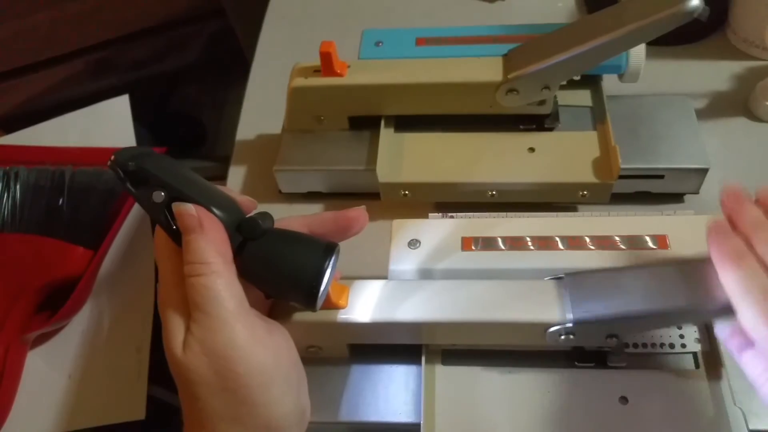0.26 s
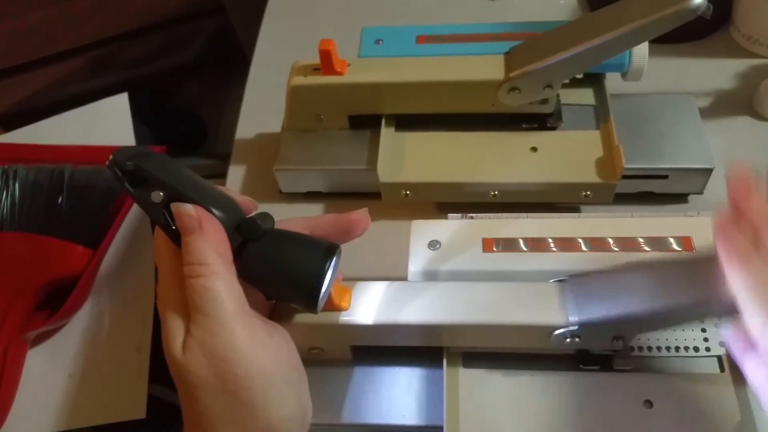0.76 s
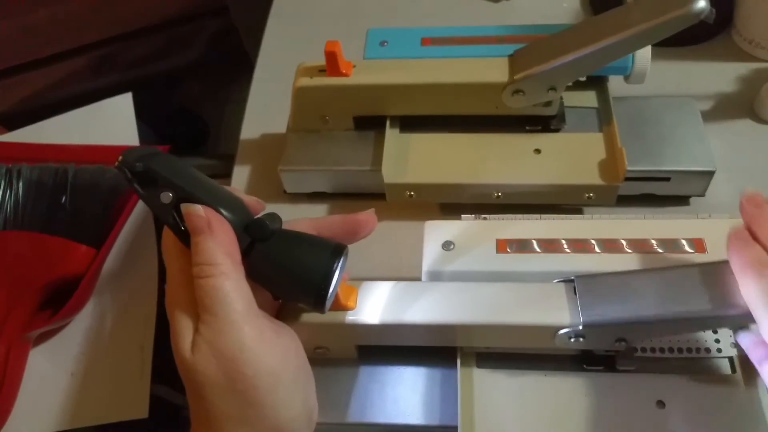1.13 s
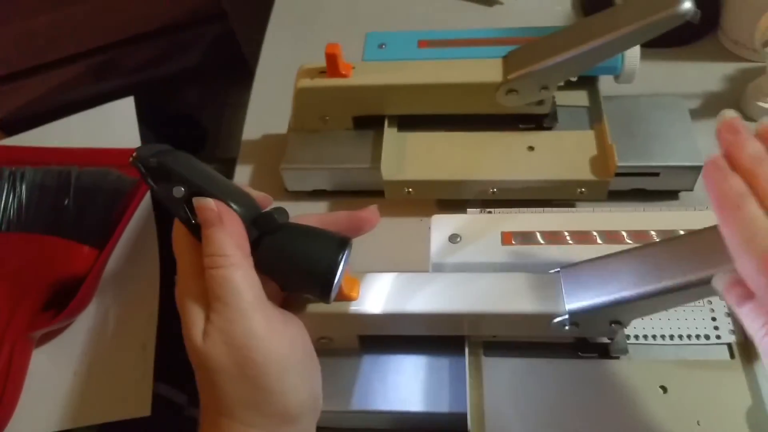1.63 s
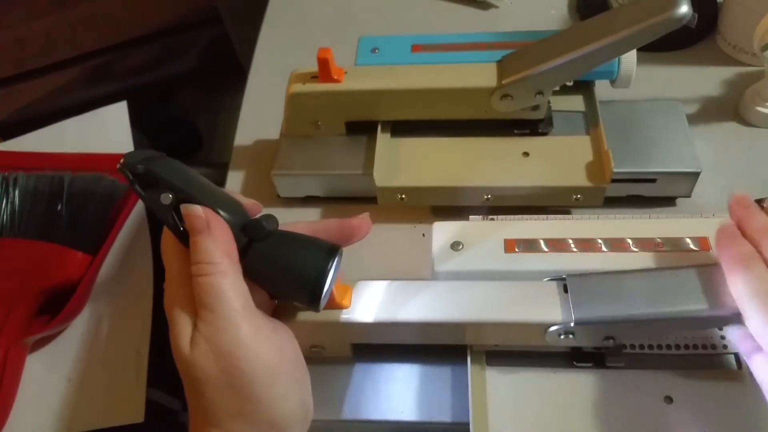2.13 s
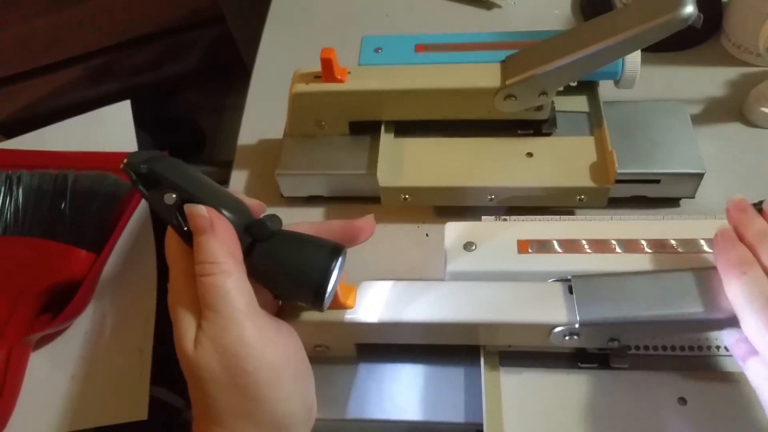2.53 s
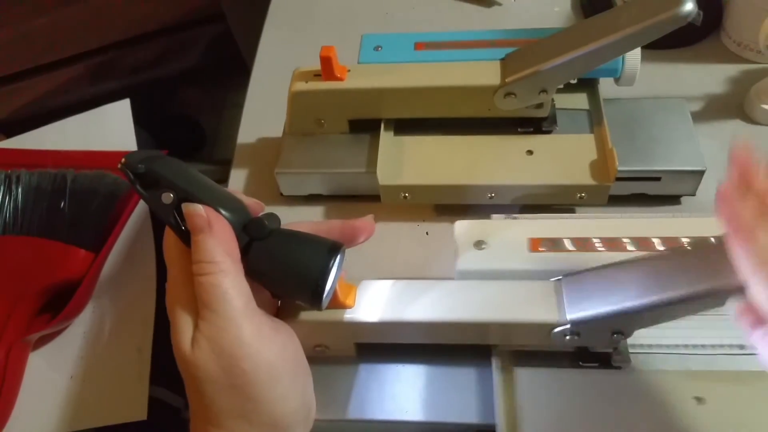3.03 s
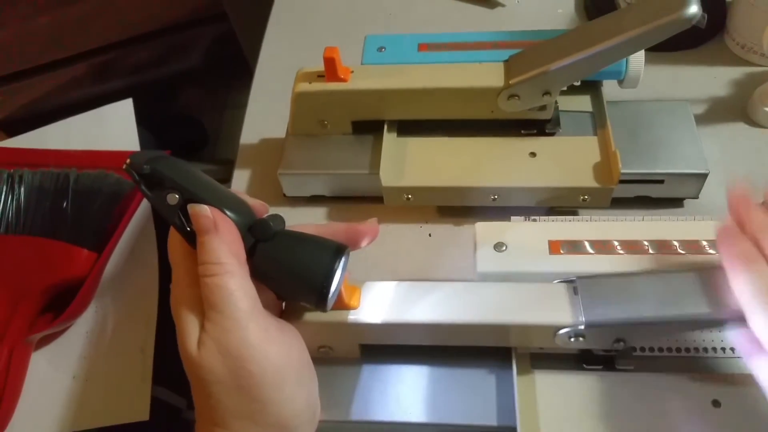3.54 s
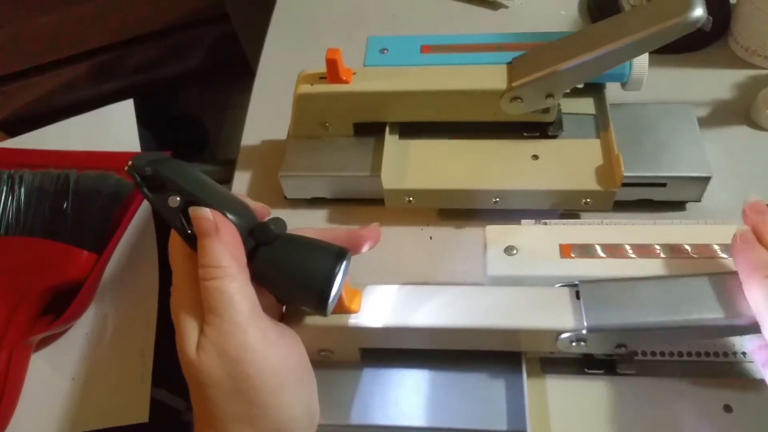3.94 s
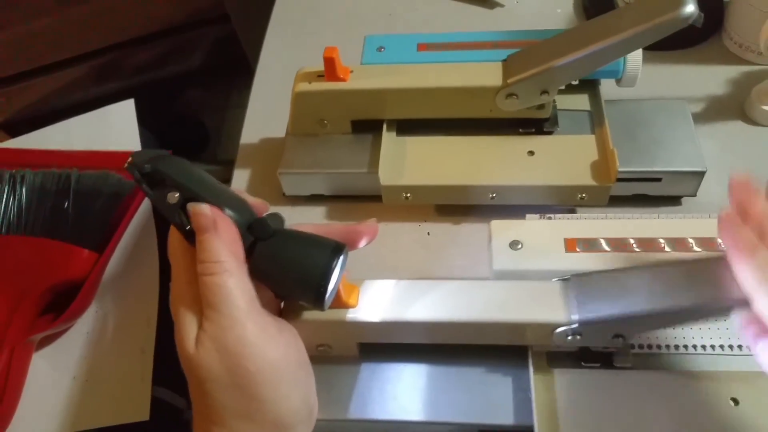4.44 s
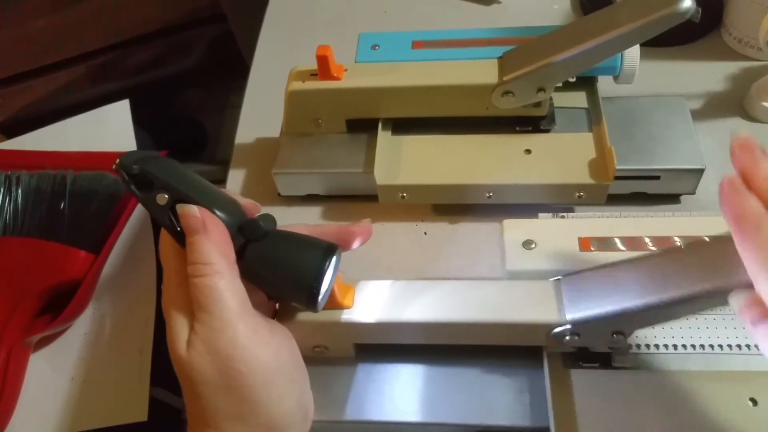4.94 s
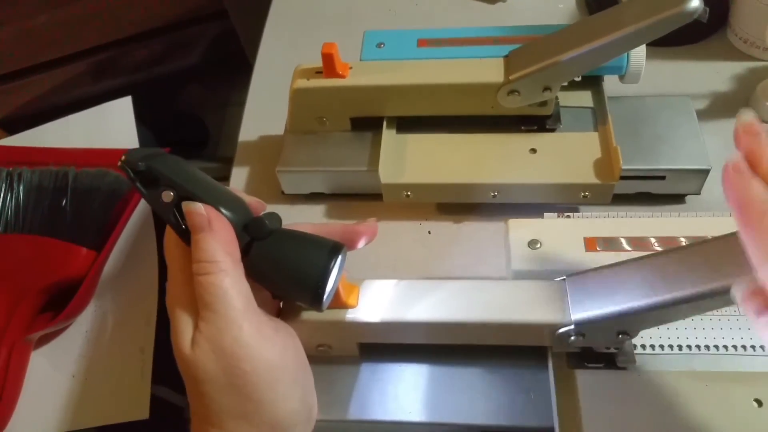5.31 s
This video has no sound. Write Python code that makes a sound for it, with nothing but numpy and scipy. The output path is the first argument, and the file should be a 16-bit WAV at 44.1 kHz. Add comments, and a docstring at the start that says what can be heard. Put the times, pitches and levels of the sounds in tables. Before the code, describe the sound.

A metal hand punch is worked quickly on a table, nearly three strokes a second. Each stroke has light ticks, a bright snap through plastic card, a heavier clunk at the bottom, then a hard rattling slam at the top stop. Close and dry in a small room, it plays from the right channel only; the left carries faint hiss.

```python
"""A hand works the lever of a small card punch on a table, about three strokes a second.
Going down the pawl ticks, the pins snap through the card and the lever bottoms; coming up it slams
on its stop and bounces. Each knock is a burst of noise that sets table, casing and lever ringing, while
loose parts sizzle and a small room echoes. Only the right microphone works, over a steady murmur;
the left input carries its own faint hiss."""
import sys
import numpy as np
from scipy import signal
from scipy.fft import rfft, irfft
from scipy.io import wavfile
from scipy.ndimage import uniform_filter1d

SR = 44100
rng = np.random.default_rng(int(sys.argv[2]) if len(sys.argv) > 2 else 0)


def wav_record(signal):
    """Record a signal, one row per channel, as 16-bit PCM in the file named by sys.argv[1]."""
    frames = np.transpose(np.atleast_2d(signal))
    bounded = np.clip(frames, -1, 1)
    # unit amplitude maps onto the largest positive 16-bit level
    quanta = np.round(bounded * 32767).astype(np.int16)
    wavfile.write(sys.argv[1], SR, quanta)


def invert_db(level):
    """Linear amplitude ratio for a level in decibels (20 dB per decade), elementwise."""
    return 10 ** (np.asarray(level, dtype=float) / 20)


N = 245621  # samples in the scene
RING = 8192  # samples that one knock may last


def coloured(shape, points):
    """Noise along the last axis whose spectrum follows (f/Hz, level/dB) points, scaled to rms 1."""
    hz, db = np.transpose(points)
    f = np.maximum(np.fft.rfftfreq(shape[-1], 1 / SR), 1)
    gain = invert_db(np.interp(np.log(f), np.log(hz), db))
    noise = irfft(rfft(rng.standard_normal(shape)) * gain, shape[-1])
    return noise / np.std(noise)


def fade(t60, size):
    """Exponential decay, 60 dB down after t60 seconds."""
    return np.exp(-np.log(1000) * np.arange(size) / SR / t60)


def high_pass(x, hz):
    """Steep low cut."""
    return signal.sosfilt(signal.butter(6, hz, "high", fs=SR, output="sos"), x)


def band(x, low_hz, high_hz):
    """Steep band-pass."""
    return signal.sosfilt(signal.butter(3, (low_hz, high_hz), "band", fs=SR, output="sos"), x)


def hiss():
    """Faint hiss of the dead input; a little of its square makes the wave lopsided."""
    # colour of the hiss: (f/Hz, level per Hz/dB)
    hiss_colour = [(30, -1), (60, 5), (130, 7), (300, 3), (800, -1), (2000, -5), (3000, -9), (4500, -16),
                   (6500, -20), (9000, -17), (12000, -16), (15000, -18)]
    noise = coloured((N,), hiss_colour)
    return invert_db(-65.7) * (noise - 0.08 * (noise ** 2 - 1))


def murmur():
    """Steady low murmur under the knocks: coloured noise."""
    # colour of the murmur: (f/Hz, level per Hz/dB)
    murmur_colour = [(25, -53), (40, -3.5), (60, -10.5), (130, -4.5), (300, -15), (600, -29.5),
                     (1000, -13.5), (2500, -33.5), (6000, -43), (12000, -55), (16000, -37)]
    return invert_db(-48.5) * coloured((N,), murmur_colour)


def kind(rows, ms, table_db=None, sizzle_db=None):
    """One kind of knock shares a contact length; table follows casing and sizzle follows lever, unless listed."""
    s, casing_db, lever_db, *own = np.transpose(rows)
    table = own[0] if table_db is None else casing_db + table_db
    sizzle = own[0] if sizzle_db is None else lever_db + sizzle_db
    return np.array([s, table, casing_db, lever_db, sizzle, np.full(len(s), ms)])


def lever_bounces():
    """The lever bounces back softly about 0.1 s after a slam."""
    # bounces: (t/s, casing level/dB, lever level/dB)
    bounces = [(.0182, -40.5, -40), (.3131, -35, -40), (.6502, -39.5, -42.5), (.9898, -39.5, -44.5),
               (1.3289, -33.5, -40), (1.3863, -47.5, -62), (1.5576, -35, -47), (1.9631, -40.5, -54),
               (2.3258, -34, -43.5), (2.669, -37.5, -39.5), (3.0327, -36.5, -43), (3.393, -38.5, -42.5),
               (3.7412, -40.5, -44), (4.1202, -34.5, -41), (4.4777, -34.5, -41.5), (4.8376, -37.5, -40.5),
               (5.203, -36, -43), (5.4412, -38, -41)]
    return kind(bounces, ms=3.2, table_db=-5, sizzle_db=-14)


def pawl():
    """On the down stroke the pawl meets the rack, slips along a tooth and drops in."""
    # dull tick on the rack: (t/s, casing level/dB, lever level/dB)
    meets = [(.3496, -49, -41.5), (.691, -46, -45), (1.0306, -49, -39), (1.602, -44, -47),
             (2.0047, -55, -44.5), (2.3638, -43, -55), (2.708, -44, -44), (3.077, -52, -39.5),
             (3.4354, -47, -41), (3.7847, -57, -46), (4.091, -44, -49), (4.1634, -45, -47),
             (4.518, -53, -43.5), (4.8804, -45, -43.5), (5.2454, -46, -44.5)]
    # slip along the tooth: (t/s, casing level/dB, lever level/dB)
    slips = [(.0344, -40, -46), (.3646, -42, -54), (1.0454, -43, -53), (2.0198, -45, -48),
             (2.3785, -43, -48), (2.7228, -45, -57), (3.0928, -47, -61), (3.4535, -44, -48),
             (3.8035, -43, -47), (4.178, -50, -44), (4.533, -45, -49), (4.8968, -46, -49),
             (5.2935, -37.5, -35)]
    # sharp click as it drops in: (t/s, casing level/dB, lever level/dB)
    clicks = [(.3737, -39.5, -32), (.7133, -43, -35.5), (1.5887, -37.5, -37), (2.3855, -50, -33.5),
              (2.7302, -52, -32.5), (3.1016, -39, -32.5), (3.459, -46, -34.5), (3.8099, -44, -31),
              (5.2666, -44, -41)]
    return np.hstack([
        kind(meets, ms=3.46, table_db=-12, sizzle_db=-15),
        kind(slips, ms=4.67, table_db=-9, sizzle_db=-6.5),
        kind(clicks, ms=0.44, table_db=-9.5, sizzle_db=-5.5)])


def pins():
    """The pins touch the card and snap through; on the up stroke they pull free."""
    # first touch: (t/s, casing level/dB, lever level/dB)
    touches = [(.0496, -36, -37.5), (.3835, -34, -40), (.724, -36, -43), (1.0602, -37, -39),
               (1.6183, -43, -39), (2.0386, -36, -40), (2.391, -54, -35), (2.7368, -39, -41),
               (3.1108, -38, -42), (3.4686, -50, -38), (4.1942, -38, -41), (4.549, -53, -39),
               (4.9126, -49, -43)]
    # snap through the card: (t/s, casing level/dB, lever level/dB, sizzle level/dB)
    snaps = [(.0664, -25, -28, -22.5), (.0714, -27, -51, -17.5), (.393, -25, -39, -18),
             (.7343, -24.5, -25.5, -19.5), (1.0739, -24.5, -30, -18), (1.6298, -21.5, -45, -20.5),
             (2.0501, -24.5, -29, -21.5), (2.4033, -24.5, -27, -20), (2.7499, -26.5, -26, -20),
             (3.1199, -24, -30, -17.5), (3.4791, -23, -59, -16), (3.829, -23, -26, -17),
             (4.2042, -23, -25, -17.5), (4.56, -24, -25, -20), (4.9231, -23, -22.5, -20.5)]
    # pull out of the card: (t/s, casing level/dB, lever level/dB)
    pulls = [(.181, -34, -43.5), (.5172, -36.5, -42.5), (.8437, -39.5, -48), (1.1749, -41, -44),
             (1.8006, -41, -50), (2.1675, -34.5, -44.5), (2.5216, -32.5, -45), (2.8788, -32, -43),
             (3.237, -33.5, -46.5), (3.593, -36, -50), (3.954, -40, -46.5), (4.312, -44, -61),
             (4.6867, -35, -47.5), (5.0409, -40.5, -48)]
    return np.hstack([
        kind(touches, ms=0.76, table_db=-22.5, sizzle_db=-12),
        kind(snaps, ms=2.4, table_db=-20),
        kind(pulls, ms=4.3, table_db=-10.5, sizzle_db=1.9)])


def bottom_of_stroke():
    """The pin block lands, the lever grinds on and bottoms, and the casing settles."""
    # pin block lands on the die and thumps the table:
    # (t/s, casing level/dB, lever level/dB, table level/dB)
    lands = [(.0903, -24, -21.5, -23), (.422, -27, -18.5, -24.5), (.7622, -28.5, -21, -24.5),
             (1.0975, -24, -25, -31), (1.6656, -32, -24, -29), (2.0819, -21.5, -20.5, -24.5),
             (2.4364, -25.5, -21, -26), (2.7818, -28, -23.5, -24.5), (3.1538, -27.5, -24.5, -25),
             (3.5105, -31, -24, -25.5), (3.8609, -26.5, -23.5, -25), (4.2361, -25, -23, -24),
             (4.5895, -23, -19.5, -24), (4.9553, -27, -21, -23)]
    # lever bottoms: (t/s, casing level/dB, lever level/dB, table level/dB)
    bottoms = [(.1023, -17, -27.5, -54), (.4407, -20.5, -30, -23.5), (.7837, -18, -28.5, -25.5),
               (1.1153, -18.5, -30.5, -22), (1.6794, -17.5, -26, -22), (2.1059, -19.5, -26, -24),
               (2.4627, -16.5, -27, -23.5), (2.8084, -17.5, -25.5, -25), (3.1819, -18, -24.5, -26.5),
               (3.5366, -19, -26, -23.5), (3.8859, -19.5, -24.5, -28.5), (4.2728, -19.5, -29, -28),
               (4.627, -17.5, -28.5, -27.5), (4.9779, -24, -42, -52)]
    # casing settles: (t/s, casing level/dB, lever level/dB)
    settles = [(.1125, -18, -36), (.4496, -19.5, -45), (.7957, -21.5, -40), (1.1251, -23, -30),
               (1.6873, -31, -41), (1.6959, -26, -42.5), (3.8948, -24, -38.5), (4.9844, -25, -42)]
    # lever grinds on: (t/s, casing level/dB, lever level/dB)
    grinds = [(.4285, -23, -38), (.7794, -19.5, -29), (1.1063, -30, -25), (2.0913, -47, -31),
              (2.101, -23, -33), (2.4477, -58, -35), (2.4556, -38, -28.5), (2.792, -31, -30),
              (3.165, -23, -23.5), (3.5241, -26, -26), (3.8694, -28, -34), (4.2619, -27.5, -27),
              (4.61, -42, -31), (4.6197, -35, -31.5), (4.969, -29, -33.5)]
    return np.hstack([
        kind(lands, ms=3.04, sizzle_db=-9),
        kind(bottoms, ms=4.7, sizzle_db=-3),
        kind(settles, ms=3.82, table_db=-30, sizzle_db=1.5),
        kind(grinds, ms=5.1, table_db=-19, sizzle_db=-5)])


def top_stop():
    """At the end of the up stroke the lever ticks, grazes its stop, slams on it and shudders."""
    # tick just ahead of the stop: (t/s, casing level/dB, lever level/dB)
    lead_ticks = [(.2155, -52, -57), (1.214, -44, -50), (1.842, -41, -39.5), (2.2092, -38, -41),
                  (2.5591, -44, -49), (2.9152, -54, -50), (4.0002, -40, -40), (4.3587, -41, -51),
                  (4.7266, -46, -54), (5.0928, -42, -44), (5.4913, -36, -40.5)]
    # lever grazes its stop: (t/s, casing level/dB, lever level/dB)
    grazes = [(.2205, -20.5, -25), (.5575, -20, -28), (.8909, -17.5, -26.5), (1.8503, -15.5, -25),
              (2.2145, -18.5, -31.5), (2.5657, -15.5, -23), (2.9214, -20, -26), (3.2859, -17.5, -25),
              (3.6409, -15, -23.5), (4.0062, -16.5, -29), (4.3661, -17, -24), (4.7333, -19, -26),
              (5.1005, -17.5, -23), (5.4988, -24, -30.5)]
    # slam: (t/s, casing level/dB, lever level/dB, table level/dB)
    slams = [(.227, -15.5, -17.5, -18.5), (.5665, -15.5, -18.5, -20.5), (.8991, -18, -21, -20),
             (1.2202, -18, -23.5, -28), (1.4208, -19.5, -17.5, -20), (1.8589, -18, -22.5, -21.5),
             (2.2225, -16.5, -20.5, -20.5), (2.5739, -18.5, -19, -23), (2.9296, -20, -18, -19),
             (3.2943, -31, -18.5, -19), (3.6488, -19.5, -18.5, -20.5), (4.0135, -18, -17, -20.5),
             (4.3782, -18, -19.5, -19.5), (4.7427, -18.5, -17.5, -20.5), (5.1075, -25, -17.5, -19.5),
             (5.3216, -23.5, -26.5, -24.5), (5.5096, -17, -23, -20.5)]
    # shudder against the stop: (t/s, casing level/dB, lever level/dB)
    shudders = [(.2371, -13.5, -23.5), (.5747, -16, -25.5), (.9098, -16, -26), (1.2458, -60, -50),
                (1.4283, -18, -25), (1.8683, -20, -22), (2.2321, -18.5, -21.5), (2.5811, -20.5, -23),
                (2.94, -15.5, -22), (3.3032, -15, -22.5), (4.0246, -16, -21.5), (4.39, -17.5, -22.5),
                (4.4195, -52, -51), (4.7524, -18.5, -24), (5.1162, -15, -25), (5.147, -48, -36),
                (5.5225, -40, -51)]
    return np.hstack([
        kind(lead_ticks, ms=0.2, table_db=0.5, sizzle_db=-2),
        kind(grazes, ms=3.53, table_db=-11, sizzle_db=-1.9),
        kind(slams, ms=3.85, sizzle_db=-3),
        kind(shudders, ms=4.87, table_db=-38, sizzle_db=-4.0)])


def lever_clinks():
    """Now and then the lever, freed when the pins snap through, clinks."""
    # clinks: (t/s, casing level/dB, lever level/dB)
    clinks = [(.4022, -37, -29), (1.6413, -59, -27), (2.4146, -47, -33), (3.13, -45, -30)]
    return kind(clinks, ms=2.6, table_db=-17, sizzle_db=-30)


def ring(modes, contact, damping):
    """Each contact sets the modes going; where it lands shifts their weights and tuning."""
    detune, scatter_db, tick_tilt_db = 0.025, 3.0, 2
    hz, db, t60 = np.transpose(modes)
    chance = rng.standard_normal((len(contact), 2, len(modes)))
    t = np.arange(RING, dtype=np.float32) / SR
    out = np.zeros((len(contact), RING), np.float32)
    for k in range(len(modes)):
        bent = (2 * np.pi * hz[k] * (1 + detune * chance[:, 0, k, None])).astype(np.float32)
        decay = np.exp((-np.log(1000) * damping / t60[k]).astype(np.float32) * t)
        # brief contacts favour high modes: tilt per octave and per doubling of the damping
        tilt_db = tick_tilt_db * np.log2(damping) * np.log2(hz[k] / hz[0])
        weight = invert_db(db[k] + tilt_db + scatter_db * chance[:, 1, k, None]).astype(np.float32)
        out += weight * decay * np.sin(bent * t)
    return signal.fftconvolve(out, contact, axes=1)[:, :RING]


def place(rows, times, db, span_s):
    """Adds each row at its knock's time, its rms level set over its first span_s seconds."""
    out = np.zeros(N + RING)
    rms = np.sqrt(np.mean(rows[:, :int(span_s * SR)] ** 2, axis=1))
    for row, s, gain in zip(rows, times, invert_db(db) / rms):
        start = max(int(s * SR) - 20, 0)  # a row begins 20 samples early
        out[start:start + RING] += gain * row
    return out[:N]


def loose_parts(rise, damping):
    """Loose parts chatter on after a knock: fading noise grains of very uneven size."""
    level_db, t60_s, grain_db = -12, 0.16, 8.5  # damping shortens the fade
    grains = rng.standard_normal(rise.shape) * invert_db(grain_db * rng.standard_normal(rise.shape))
    return invert_db(level_db) * rise * fade(t60_s, rise.shape[1]) ** damping * grains / np.std(grains)


def table_thump(s, table_db, t, chatter, damping):
    """The heavy table feels nearly the same short smooth push every time, plus some chatter."""
    # what rings in the table: (f/Hz, level/dB, t60/s at damping 1)
    table_modes = [(103.2, -7.5, 0.45), (134.6, 5, 0.1), (168.3, 2, 0.12), (207.3, 6, 0.053),
                   (257.6, 1.5, 0.048), (289.3, -12, 0.088), (346.6, -14, 0.056), (400, -8.5, 0.077),
                   (478, -4.5, 0.021), (516, -25, 0.043)]
    push = np.tile(t * np.exp(-t / 0.00026), (len(s), 1))
    thump = place(ring(table_modes, push, np.ones_like(damping)), s, table_db, 0.016)
    # the chatter also shakes the upper table modes
    shaken = band(ring(table_modes, chatter, damping), 287.0, 800)
    return thump + place(shaken, s, table_db - 8.5, 0.011)


def casing_ring(s, casing_db, t, tau, chatter, damping):
    """The casing is squeezed before steel meets steel, so its ring starts ahead and builds up smoothly."""
    # what rings in the casing: (f/Hz, level/dB, t60/s at damping 1)
    casing_modes = [(810, -24, 0.036), (806, 9.5, 0.026), (895, -1, 0.066), (898, 4.5, 0.033),
                    (972, 9, 0.022), (985, -17, 0.047), (1002, 8.5, 0.023), (1113, 3.5, 0.016),
                    (1150, -17, 0.0083), (1205, -4, 0.12), (1334, 3, 0.016)]
    squeeze = chatter * fade(0.21, len(t)) * (1 - np.exp(-(t / (0.85 * tau)) ** 2))
    rows = band(ring(casing_modes, squeeze, damping), 735, 1297)
    lead = 0.784 * tau[:, 0]
    return place(rows, s - lead, casing_db, 0.013)


def lever_ring(s, lever_db, chatter, damping):
    """The chatter makes the steel lever ring in the middle treble."""
    # what rings in the lever: (f/Hz, level/dB, t60/s at damping 1)
    lever_modes = [(1488, -7, 0.022), (1528, -7, 0.068), (1780, -8, 0.0083), (1772, 2.5, 0.038),
                   (1854, 13.5, 0.011), (2090, -9, 0.0072), (2150, -5.5, 0.076), (2165, 4.5, 0.02),
                   (2510, -7, 0.022), (2660, -13.5, 0.039), (2800, -8.5, 0.039), (2820, -10.5, .012),
                   (3450, -31, 0.0037), (3830, 0.5, 0.01), (4210, -5, 0.018)]
    return place(band(ring(lever_modes, chatter, damping), 1300, 3520), s, lever_db, 0.01)


def steel_sizzle(s, sizzle_db, t, tau, shape, damping):
    """Small steel parts rasp: bright noise in uneven grains, with a tail after each contact."""
    # colour of the rasp, lifted near 12 kHz by the microphone port: (f/Hz, level per Hz/dB)
    rasp_colour = [(1500, 14), (3000, 3), (4500, -7), (5200, -13), (5900, 0), (7000, -27), (8500, -17),
                   (10000, -3), (12200, 7), (14000, -0.5), (16000, -23.5)]
    # change of the sizzle along the card: (t/s, level/dB)
    along_card = [(0, 0.5), (1.7, 3), (2.9, 0), (3.9, -1.5), (4.7, -0.5), (5.57, 2)]
    t60_s, crunch_db, crunch_s = 0.038, 5, 0.0008  # damping shortens the tail
    tail = (1 - np.exp(-t / (0.6 * tau))) * fade(t60_s, len(t)) ** damping
    crunch = uniform_filter1d(rng.standard_normal(shape.shape), int(crunch_s * SR), axis=1)
    grains = invert_db(crunch_db * crunch / np.std(crunch))
    envelope = (shape + invert_db(9) * tail) * (1 - np.exp(-t / (0.24 * tau))) * grains
    rasp = coloured(shape.shape, rasp_colour) * envelope
    rasp = np.pad(rasp, ((0, 0), (0, RING - len(t))))
    level_db = sizzle_db + np.interp(s, *np.transpose(along_card))
    return place(high_pass(rasp, 1720), s, level_db, 0.0055)


def punch():
    """Short bursts of chatter drive table, casing and lever; the loose parts sizzle."""
    knocks = np.hstack([lever_bounces(), pawl(), pins(), bottom_of_stroke(), top_stop(), lever_clinks()])
    s, table_db, casing_db, lever_db, sizzle_db, ms = knocks
    t = np.arange(RING // 2) / SR
    tau = ms[:, None] / 1000  # contact length in seconds
    rise = 1 - np.exp(-t / (0.44 * tau))
    shape = rise * np.exp(-t / (1.075 * tau))
    shape = shape / shape.max(axis=1, keepdims=True)
    # a light, brief tick moves small parts only: they ring and rattle for a shorter time
    damping = np.clip(0.0022 / tau, 1, 7)
    chatter = shape * rng.standard_normal(shape.shape) + loose_parts(rise, damping)
    body = table_thump(s, table_db, t, chatter, damping)
    body = body + casing_ring(s, casing_db, t, tau, chatter, damping)
    body = body + lever_ring(s, lever_db, chatter, damping)
    return body + steel_sizzle(s, sizzle_db, t, tau, shape, damping)


def room(x):
    """Dense echoes that build up over a few ms and die band by band."""
    # bands of the room: (f/Hz, t60/s, level/dB)
    room_bands = [(131, 0.24, 0.5), (503, 0.12, 6), (920, 0.21, -8), (2300, 0.14, -5), (4700, 0.2, 5),
                  (7700, 0.17, 0), (11800, 0.17, -3)]
    level_db, onset_s = -11, 0.0023
    size = int(0.6 * SR)
    hz, t60, db = np.transpose(room_bands)
    f = np.maximum(np.fft.rfftfreq(size, 1 / SR), 1)
    spot = np.interp(np.log(f), np.log(hz), np.arange(len(hz)))
    noise = rfft(rng.standard_normal(size))
    echo = 0
    for k in range(len(hz)):
        # neighbouring bands cross-fade, their shares adding up to one
        share = irfft(noise * np.maximum(1 - np.abs(spot - k), 0), size)
        echo = echo + invert_db(db[k]) / np.sqrt(t60[k]) * share * fade(t60[k], size)
    echo = echo * (1 - np.exp(-np.arange(size) / SR / onset_s))
    echo = echo / np.sqrt(np.sum(echo ** 2))
    return invert_db(level_db) * signal.fftconvolve(x, echo)[:N]


def scene():
    """The punch and its room reach the right microphone only."""
    near = punch()
    return np.array([np.zeros(N), near + room(near)])


def band_limit(x):
    """A steep low-pass at the top of the band."""
    return signal.sosfilt(signal.butter(12, 16660, fs=SR, output="sos"), x)


def record(dry):
    """The live microphone cuts the bass; the dead input hisses lopsidedly; both carry a tiny offset."""
    # constant shift of each input: (left, right) [full scale = 1]
    offset = (-.00044, -.0006)
    background = np.array([hiss(), murmur()])
    mix = high_pass(dry, 112) + background + np.array(offset)[:, None]
    return band_limit(mix)


dry = scene()
out = record(dry)
wav_record(out)
```